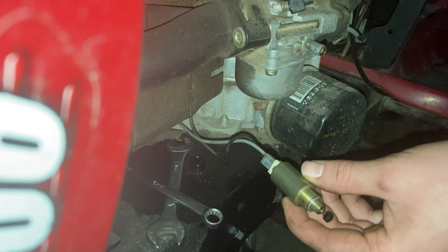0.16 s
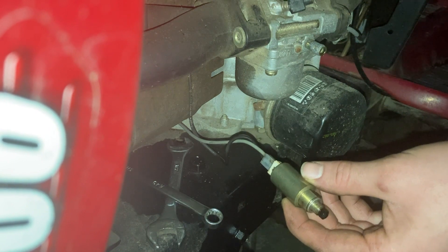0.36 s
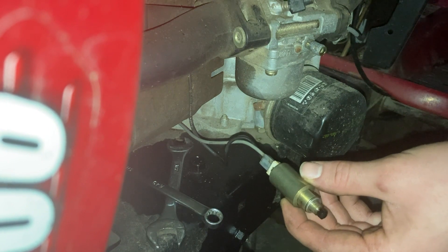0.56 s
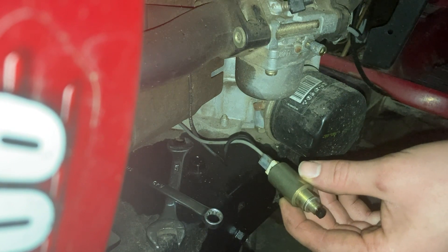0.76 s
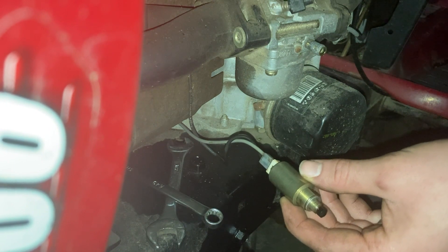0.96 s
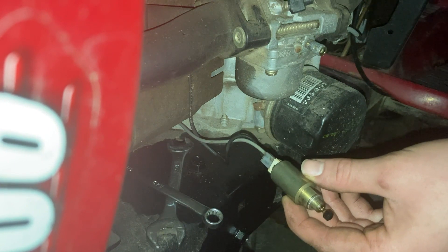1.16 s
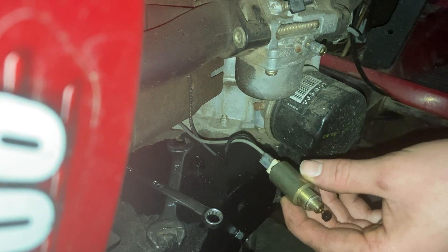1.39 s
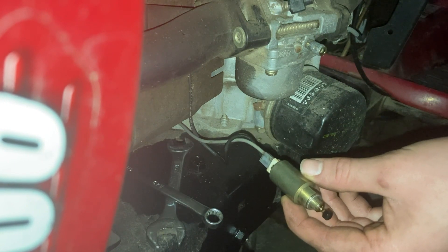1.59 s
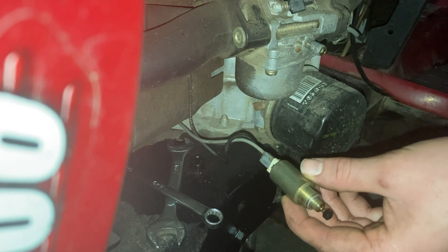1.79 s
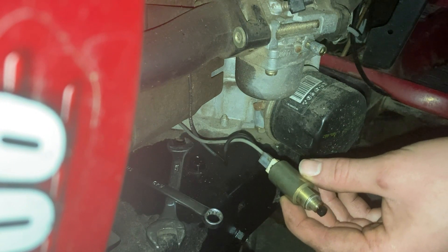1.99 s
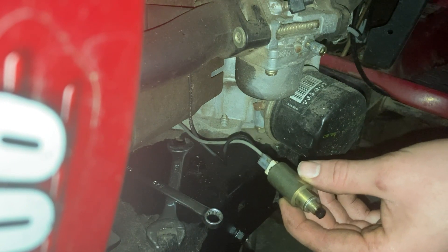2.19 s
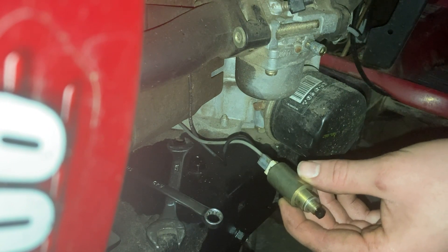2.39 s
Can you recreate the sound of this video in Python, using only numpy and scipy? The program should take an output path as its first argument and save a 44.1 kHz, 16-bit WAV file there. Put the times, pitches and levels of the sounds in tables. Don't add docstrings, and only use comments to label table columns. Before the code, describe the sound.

Hard metallic key-switch clacks and bright solenoid plunger clicks, irregularly spaced over a faint low hum

```python
import sys
import numpy as np
from scipy import signal
from scipy.fft import rfft, irfft
from scipy.io import wavfile
from scipy.ndimage import uniform_filter1d

SR = 44100
rng = np.random.default_rng(int(sys.argv[2]) if len(sys.argv) > 2 else 0)


def transcribe(u):
    v = np.clip(np.atleast_2d(u).T, -1, 1)
    q = np.round(v * 32767).astype(np.int16)
    wavfile.write(sys.argv[1], SR, q)


def level_to_linear(level):
    exponent = np.asarray(level, float) / 20
    return 10 ** exponent


N = 108045


def read(points, hz):
    f, value = np.transpose(points)
    return np.interp(np.log(hz + 1), np.log(f + 1), value)


def evened(x):
    return x / np.sqrt(np.mean(x ** 2) + 1e-20)


def unit(x):
    return x / np.abs(x).max()


def add(mix, time_s, sound):
    part = mix[..., round(time_s * SR):][..., :sound.shape[-1]]
    part += sound[..., :part.shape[-1]]


def coloured(x, points):
    size = x.shape[-1]
    gain = level_to_linear(read(points, np.fft.rfftfreq(size, 1 / SR)))
    return irfft(rfft(x) * gain, size)


def pair(size):
    a, b = rng.standard_normal((2, size))
    return np.array([a + 0.3 * b, a - 0.39 * b])


def ring(modes, rise_s, scatter_rad, size=16000):
    detune, port_spread_rad = 0.006, 0.9
    hz, db, t60_s = np.transpose(modes)[:, :, None]
    t = np.arange(size) / SR
    chance = rng.standard_normal((len(modes), 4))
    level_jitter_db, pitch, lag, start = np.split(chance, 4, axis=1)
    phase = 2 * np.pi * hz * (1 + detune * pitch) * t + scatter_rad * start
    decay = level_to_linear(db + level_jitter_db - 60 * t / t60_s)
    swell = 1 - np.exp(-(t / rise_s) ** 2)
    ports = [(decay * np.sin(phase + side * port_spread_rad * lag)).sum(0) * swell for side in (-.5, .5)]
    return unit(np.array(ports))


def key():
    # (time [s], clatter level [dB], switch level [dB], dash level [dB], frame level [dB])
    detents = [
        (0.2076, -25, -24, -31, -33),
        (0.328, -41.5, -30.5, -31.5, -27.5),
        (1.0297, -54.5, -38.5, -37, -39),
        (1.1564, -29.5, -26.5, -26, -30.5),
        (1.3795, -74, -42, -43.5, -44.5),
        (1.8667, -31.5, -28.5, -35.5, -35.5),
        (2.117, -42.5, -34.5, -30, -35),
    ]
    # (frequency [Hz], density [dB per Hz])
    clatter_spectrum = [(700, -45.5), (1500, 0), (2900, 3.5), (4500, 0.5), (5800, -13), (7000, -1),
                        (11000, -6.5), (16000, -15)]
    # (frequency [Hz], level [dB], T60 [s])
    switch_modes = [(690, -3, 0.039), (745, -3.5, 0.047), (860, -5, 0.053), (1064, -1.5, 0.039),
                    (1278, -4, .035), (1456, -2, 0.029), (1568, -5, 0.02), (1690, -5, 0.031),
                    (1917.4, -9.5, 0.07), (1948, -3, .025), (2300, -9.5, 0.055), (2876, -4.5, 0.019),
                    (3559, -5.5, 0.014), (4134, -9, 0.027)]
    # (frequency [Hz], level [dB], T60 [s])
    dash_modes = [(335, -10, .1), (398, -7, .1), (422, 0, .09), (505, -1, .055), (600, -16, .05)]
    # (frequency [Hz], level [dB], T60 [s])
    frame_modes = [(180, -10, .18), (197, -3, .2), (230, -4, .16), (266, 0, .2), (290, -5, .16)]
    clatter_rise_s, clatter_fall_s, grit_db = 0.002, 0.0055, 2
    tick_fall_s, tick_level_db = 0.0007, -3
    tick_spectrum = [(3000, -30), (6000, 0), (12000, 0), (16000, -14)]

    out, t = np.zeros((2, N)), np.arange(2048) / SR
    clatter_shape = (1 - np.exp(-t / clatter_rise_s)) * np.exp(-t / clatter_fall_s)
    tick_shape = t * np.exp(-t / tick_fall_s)
    for time_s, clatter_db, switch_db, dash_db, frame_db in detents:
        steps = np.repeat(rng.standard_normal(len(t) // 16), 16)
        grit = pair(len(t)) * level_to_linear(grit_db * steps)
        clatter = unit(coloured(grit, clatter_spectrum) * clatter_shape)
        tick = unit(coloured(grit, tick_spectrum) * tick_shape)
        add(out, time_s, level_to_linear(clatter_db) * (clatter + level_to_linear(tick_level_db) * tick))
        add(out, time_s, level_to_linear(switch_db) * ring(switch_modes, rise_s=0.001, scatter_rad=10.02))
        add(out, time_s, level_to_linear(dash_db) * ring(dash_modes, rise_s=0.0038, scatter_rad=0.95))
        add(out, time_s, level_to_linear(frame_db) * ring(frame_modes, rise_s=0.005, scatter_rad=17))
    return out


def knocks():
    # (time [s], frequency [Hz], level [dB], T60 [s])
    struck_parts = [(.2085, 2330, -36, .015), (.2088, 500, -27, .022), (.2090, 1470, -31, .025),
                    (.2097, 2840, -26, 0.016), (.2103, 6750, -30, .014), (.2122, 3780, -36, 0.024),
                    (.3272, 10800, -37, .012), (.3280, 7100, -42, 0.012), (.3284, 1080, -38, .03),
                    (.3286, 750, -39, 0.026), (.3290, 270, -32, 0.041), (1.1, 406, -43, 0.044),
                    (1.0505, 300, -42, .03), (1.0930, 5170, -49, .012), (1.1572, 1773, -27, .01),
                    (1.1574, 7340, -40, 0.0079), (1.1585, 410, -25, .022), (1.1605, 2300, -33, 0.0149),
                    (1.1610, 3500, -36, .015), (1.8668, 1480, -33, 0.038), (1.8670, 690, -28, .045),
                    (1.8671, 1060, -38, 0.033), (1.8672, 2964, -40, 0.026), (1.8673, 6800, -37, .018),
                    (1.8690, 3950, -41.5, .02), (1.8755, 1500, -36, .03), (1.9452, 1400, -35.5, 0.0048),
                    (2.1165, 10800, -42, 0.014), (2.1194, 450, -25, .022)]
    rise_cycles, lag_rad, wide_hz = 0.77, 0.5, 800
    out, t = np.zeros((2, N)), np.arange(6000) / SR
    for time_s, hz, db, t60_s in struck_parts:
        swell = 1 - np.exp(-(t * hz / rise_cycles) ** 2)
        port_lag = lag_rad * min(hz / wide_hz, 1) * np.array([[1], [-1]])
        tone = np.sin(2 * np.pi * hz * t + port_lag)
        add(out, time_s, level_to_linear(db) * unit(level_to_linear(-60 * t / t60_s) * swell * tone))
    return out


def rocking():
    # (time [s], level [dB])
    swings = [
        (.225, -47),
        (0.337, -38),
        (1.038, -49),
        (1.163, -49.5),
        (1.383, -51),
        (1.937, -41),
        (2.129, -47.5),
        (2.198, -48.5),
    ]
    swing_hz, rise_s, t60_s = 62.3, 0.029, 0.21
    out, t = np.zeros(N), np.arange(SR // 2) / SR
    for time_s, db in swings:
        swell = 1 - np.exp(-t / rise_s)
        add(out, time_s, level_to_linear(db - 60 * t / t60_s) * swell * 2 * np.sin(2 * np.pi * swing_hz * t))
    return out


def plunger():
    # (time [s], level [dB])
    rattle_hits = [
        (1.0645, -45),
        (1.0662, -32),
        (1.0678, -28),
        (1.0748, -41),
    ]
    # (frequency [Hz], level [dB], T60 [s])
    bore_modes = [(2164, -9, 0.01), (3410, -0.5, 0.0069), (3850, -1.5, 0.0057), (4600, -16, 0.0055),
                  (6640, -20, .005), (8250, -25, 0.0072), (10800, -22, 0.0062)]
    # (time [s], level [dB])
    pull_hits = [
        (1.9380, -22.5),
        (1.9398, -34.5),
        (1.9412, -28),
    ]
    # (frequency [Hz], level [dB], T60 [s])
    seat_modes = [(2160, -6, 0.017), (2938, -0.5, .014), (3323, -4.5, 0.014), (3480, -6.5, 0.011),
                  (4140, -4.5, 0.0084), (6600, -28, .006), (11000, -22.5, 0.0046)]
    # (time [s], level [dB])
    snap_hits = [
        (.2215, -10),
        (.2246, -23),
        (.2282, -32),
        (1.9455, -19),
        (1.9490, -36),
    ]
    # (frequency [Hz], level [dB], T60 [s])
    cap_modes = [(3200, -13, .005), (6600, -9, .004), (7900, -7, .005), (8450, -22, .03), (4250, -13, .005),
                 (9400, -5, .004), (10600, -3, .003), (11800, -2, .003), (12800, -1, .0028),
                 (14000, -7, .0025), (15200, -14, .003)]
    out = np.zeros((2, N))
    contacts = (
        (rattle_hits, bore_modes, 0.00034),
        (pull_hits, seat_modes, 0.00034),
        (snap_hits, cap_modes, 0.00015),
    )
    for hits, modes, rise_s in contacts:
        for time_s, db in hits:
            add(out, time_s, level_to_linear(db) * ring(modes, rise_s, scatter_rad=0, size=4000))
    return out


def rustles():
    # (time [s], level [dB], centre frequency [Hz], rise [s], fall [s])
    puffs = [(.0, -72, 470, 0.0042, 0.14), (.05, -60.5, 750, 0.015, 0.019), (0.0, -74, 1700, 0.014, 0.076),
             (0.195, -55.5, 2340, 0.008, 0.011), (0.524, -67.5, 2650, 0.0034, 0.022),
             (.875, -61, 274, 0.0055, 0.031), (.88, -68.5, 8500, 0.0065, 0.01),
             (.78, -73, 900, 0.035, 0.08), (1.3776, -45.5, 1667, 0.0012, 0.0066),
             (1.665, -64, 2193, 0.0023, 0.0071), (0.197, -57.5, 6000, 0.008, 0.0087),
             (1.689, -53.5, 306, 0.013, 0.036), (1.853, -66, 5000, 0.012, 0.01),
             (1.853, -64, 2000, 0.012, 0.01), (1.946, -55, 7800, .001, 0.012),
             (.33, -61.5, 8150, 0.0022, .025), (1.095, -71, 5000, .002, .012),
             (1.148, -68, 4000, .006, .005), (.223, -50, 11000, .001, .008), (1.947, -56, 11500, .001, .01),
             (2.107, -60, 597, .005, .005), (2.245, -54, 279, 0.0087, 0.041),
             (2.321, -75, 408, 0.0079, 0.026)]
    width_octaves = 0.63
    out, t = np.zeros((2, N)), np.arange(8192) / SR
    hz = np.fft.rfftfreq(8192, 1 / SR) + 1
    for time_s, db, centre_hz, rise_s, fall_s in puffs:
        band = np.exp(-(np.log2(hz / centre_hz) / width_octaves) ** 2)
        puff = evened(irfft(rfft(pair(len(t))) * band))
        add(out, time_s, level_to_linear(db) * puff * (1 - np.exp(-t / rise_s)) * np.exp(-t / fall_s))
    return out


def squeaks():
    # (time [s], length [s], frequency [Hz], level [dB])
    whistles = [
        (0.059, 0.066, 3700, -82.5),
        (0.73, 0.059, 5700, -88),
        (0.46, 0.035, 7400, -83.5),
        (1.42, 0.084, 3200, -90),
        (0.04, 0.038, 7400, -86.5),
    ]
    out = np.zeros(N)
    for time_s, length_s, hz, db in whistles:
        t = np.arange(0, length_s, 1 / SR)
        fuzz = uniform_filter1d(rng.standard_normal((2, 12000)), size=120)[:, :len(t)]
        tone = fuzz[0] * np.cos(2 * np.pi * hz * t) + fuzz[1] * np.sin(2 * np.pi * hz * t)
        add(out, time_s, level_to_linear(db) * evened(tone) * np.sqrt(np.sin(np.pi * t / length_s)))
    return out


def garage(x):
    # (frequency [Hz], gain [dB])
    wall_loss = [(3000, 0), (6000, -4), (9000, -7), (16000, -9)]
    # (frequency [Hz], T60 [s])
    room_t60 = [(60, 0.18), (200, 0.47), (500, 0.43), (1200, 0.45), (3000, 0.35), (6000, 0.33),
                (12000, 0.3), (16000, .25)]
    first_echo_s, port_likeness = 0.0031, 0.26
    taps = rng.choice([-1., 1.], (2, SR))
    taps[1] = port_likeness * taps[0] + (1 - port_likeness) * taps[1]
    hz, t, z = signal.stft(taps, SR, nperseg=256)
    decay_db = read(wall_loss, hz)[:, None] - 60 * t / read(room_t60, hz)[:, None]
    tail = signal.istft(z * level_to_linear(decay_db), SR, nperseg=256)[1]
    tail = tail / np.linalg.norm(tail, axis=1)[:, None]
    tail = np.pad(tail, ((0, 0), (round(first_echo_s * SR), 0)))
    return signal.fftconvolve(x[None], tail, axes=1)[:, :N]


def hum():
    # (frequency [Hz], rms level [dB])
    mains_lines = [(59.2, -62.5), (119.5, -63.5), (178, -82)]
    waver_depth, waver_hz = 0.7, 6
    t, out = np.arange(N) / SR, np.zeros(N)

    def waver():
        rates_hz = waver_hz * np.geomspace(.1, 1, num=12)
        return evened(sum(np.sin(2 * np.pi * (rate * t + rng.random())) for rate in rates_hz))

    for hz, db in mains_lines:
        drift = 1 + waver_depth * (waver() + 1j * waver())
        out += level_to_linear(db) * np.sqrt(2) * (np.exp(2j * np.pi * hz * t) * drift).real
    return out


def air():
    # (frequency [Hz], correlation [-1..1])
    likeness = [(60, 0.62), (200, 0.95), (400, .7), (800, 0.72), (1500, .1), (16000, .1)]
    # (frequency [Hz], density [dB per Hz])
    hiss_spectrum = [(100, -40.5), (140, -10.5), (200, -15.5), (1000, -34), (2500, -40), (6000, -46.5),
                     (10000, -47), (15000, -51)]
    # (frequency [Hz], density [dB per Hz])
    rumble_spectrum = [(18, -25.5), (30, -21), (45, -11), (60, -9), (80, 0.5), (105, 0.5), (140, -10),
                       (220, -52.5)]
    hiss_db, rumble_db, patchy_db = -69.5, -66.5, 1.4
    frames, hz = N // 256 + 5, np.fft.rfftfreq(1024, 1 / SR)
    a, b, c, d, patches = rng.standard_normal((frames, 513, 5)).T
    patches = uniform_filter1d(patches, size=14, axis=0)
    patches = evened(uniform_filter1d(patches, size=10, axis=1))
    same = np.clip(read(likeness, hz), -1, 1)[:, None]
    left = a + 1j * b
    right = same * left + np.sqrt(1 - same ** 2) * (c + 1j * d)
    z = np.array([left, right]) * level_to_linear(patchy_db * patches)
    noise = signal.istft(z, nperseg=1024, noverlap=768)[1][:, :N]
    hiss = evened(coloured(noise, hiss_spectrum))
    rumble = evened(coloured(noise, [*rumble_spectrum, (500, -100)]))
    return level_to_linear(hiss_db) * hiss + level_to_linear(rumble_db) * rumble


def scene():
    key_wet_db, knock_wet_db, plunger_wet_db, fade_s = -7.5, -17, -23, 0.012
    turns, blows, ticks = key() + rustles(), knocks(), plunger()
    wet = garage(level_to_linear(key_wet_db) * turns[0] + level_to_linear(knock_wet_db) * blows[0])
    wet = wet + garage(level_to_linear(plunger_wet_db) * ticks[0])
    mix = turns + blows + ticks + wet + rocking() + squeaks() + hum() + air()
    return mix * np.clip((N - np.arange(N)) / (fade_s * SR), 0, 1)


def low_pass(x):
    return signal.sosfilt(signal.butter(12, 16820, fs=SR, output="sos"), x)


def record(dry):
    # (frequency [Hz], phase [rad])
    left_lead = [(7150, -.2), (8270, -2), (10900, -5.8), (11600, -6.5), (13100, -9.1), (14400, -9.7),
                 (15100, -12.5), (16400, -12.6)]
    # (frequency [Hz], left minus right [dB])
    left_over_right = [(60, 2.76), (200, 0.5), (400, -1.5), (700, 5), (2400, 2.07), (5000, 1),
                       (16000, -1.5)]
    # (frequency [Hz], gain [dB])
    mic_response = [(15, -20), (30, -3), (45, 4.5), (60, 1), (15600, 1), (16100, -15.5), (16700, -43.5)]
    one_port_hz, port_gap_s = 6400, 0.00003
    hz, z = np.fft.rfftfreq(N, 1 / SR), rfft(dry)
    shared = np.clip((hz - one_port_hz) / 400, 0, 1)
    z = np.array([z[0], (1 - shared) * z[1] + shared * z[0]])
    lead_rad = read(left_lead, hz) * shared - 2 * np.pi * hz * port_gap_s * (1 - shared)
    half = level_to_linear(read(left_over_right, hz) / 2) * np.exp(.5j * lead_rad)
    mix = irfft(z * level_to_linear(read(mic_response, hz)) * np.array([half, 1 / half]), N)
    return low_pass(mix)


dry = scene()
out = record(dry)
transcribe(out)
```